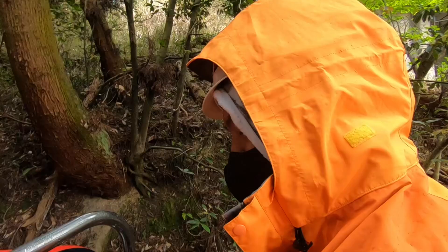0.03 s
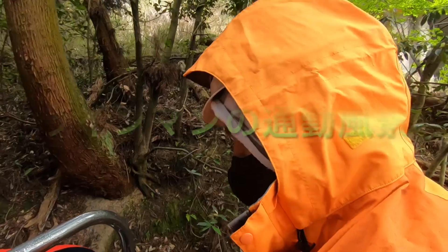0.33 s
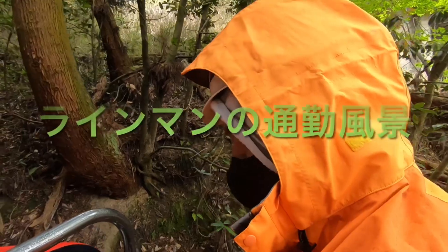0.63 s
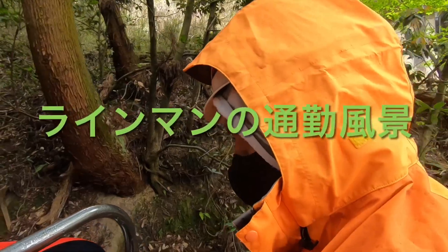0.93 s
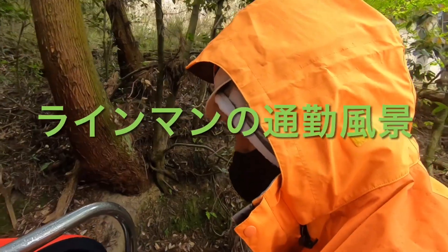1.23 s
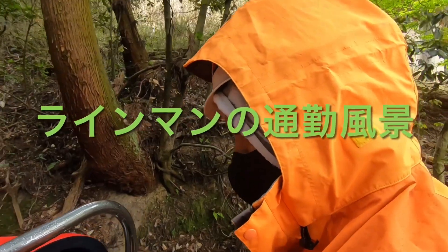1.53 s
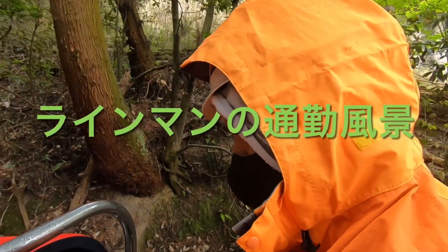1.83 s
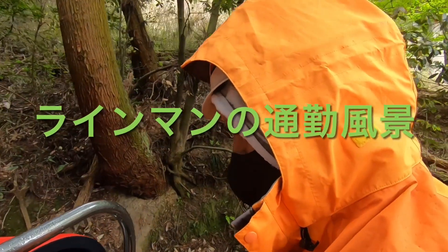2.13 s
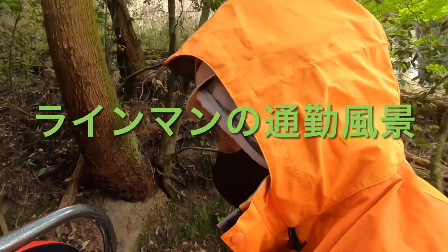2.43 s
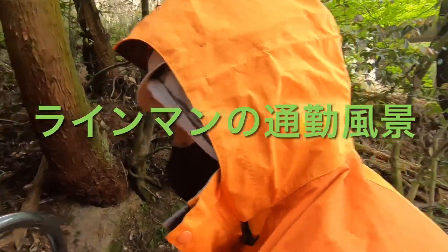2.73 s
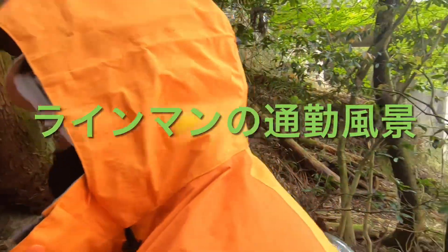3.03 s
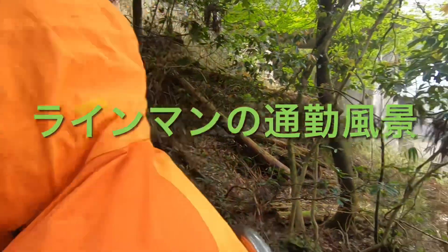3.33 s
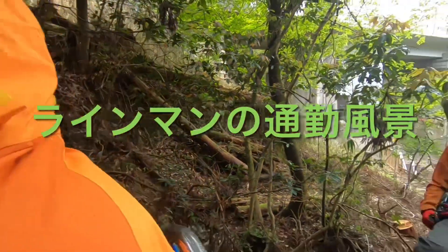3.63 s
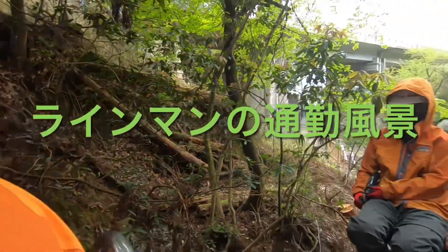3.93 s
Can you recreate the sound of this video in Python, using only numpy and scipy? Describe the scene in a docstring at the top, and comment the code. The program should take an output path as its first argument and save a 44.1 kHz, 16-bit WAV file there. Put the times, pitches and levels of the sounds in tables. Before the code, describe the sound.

A small petrol engine on a work monorail fades in within the first 0.3 seconds and drones close by at constant speed. Its deep hum carries rapid valve and gear clatter, ringing metal covers, an exhaust burble in short swells and rushing air. From about 3 seconds the microphone turns, the clatter softens and a mid-pitched gear whine comes forward, while the drone continues to the end at 4 seconds.

```python
"""Work monorail on a wooded slope

Taken from the seat, close to a small petrol engine that climbs at a governed, steady speed.
A deep two-note drone carries a clatter of valves and gears that repeats every engine cycle, with
ringing metal covers, an exhaust burble that surges as puffs ring the pipe, and rushing air.
The sound fades in; near the end the microphone turns, the clatter softens, a gear tone comes forward."""
import sys
import numpy as np
from scipy import signal
from scipy.fft import irfft
from scipy.io import wavfile
from scipy.ndimage import uniform_filter1d

SR = 44100
rng = np.random.default_rng(int(sys.argv[2]) if len(sys.argv) > 2 else 0)


def pcm_store(signal):
    """Save signal as 16-bit PCM."""
    levels = np.round(np.clip(np.atleast_2d(signal), -1, 1) * 32767)
    wavfile.write(sys.argv[1], SR, levels.astype(np.int16).T)


N = 176400
TIME = np.arange(N) / SR
CYCLE_HZ = 27.58   # engine cycles a second


def engine_cycles():
    """Running count of engine cycles; the governor leaves only a slight wander and flutter."""
    speed = 1 + 0.000399 * drift(0.84) + 0.0015 * drift(23.4)
    return np.cumsum(CYCLE_HZ * speed) / SR


def drone(cycles, level_db=-18, overtone_lag_s=0.0003):
    """Harmonics 3 and 6 line up into three pressure dips a cycle; the weak ones fall anywhere."""
    # low engine harmonics: (multiple of the cycle rate, relative level [dB])
    harmonics = [(1, -49.5), (2, -20.5), (3, 0.5), (4, -24), (5, -20), (6, -2), (7, -19.5), (8, -18),
                 (9, -19), (10, -20.5), (11, -19), (12, -25), (13, -33.5)]
    # the lowest three fill out: (time [s], gain [dB])
    bass_swell = [(.2, -5.5), (1.1, -2.5), (2, -1), (4, -0.55)]
    aligned = {3: 0, 6: 6 * CYCLE_HZ * overtone_lag_s}
    out = 0
    for multiple, db in harmonics:
        offset = aligned.get(multiple, rng.random())
        swell_db = in_time(bass_swell)[0] if multiple <= 3 else 0
        tone = np.sqrt(2) * np.cos(2 * np.pi * (multiple * cycles - offset))
        out = out - from_db(level_db + db + swell_db) * tone
    return out


def exhaust(beat, depth=0.82):
    """Puffs of noise, three a cycle, ring the exhaust pipe."""
    # pipe resonances: (frequency [Hz], width [Hz], level [dB])
    pipe = [(224, 47, -34.5), (290.7, 49, -32.5)]
    out = 0
    for hz, width_hz, db in pipe:
        puffs = (1 + depth * beat) * rng.standard_normal(N)
        out = out + from_db(db) * rms_one(resonance(puffs, hz, width_hz))
    return out


def exhaust_surges(beat, throb=0.13):
    """Runs of harder puffs make the pipe boom in short, rounded swells."""
    # swells of the boom: (peak time [s], length [s], level [dB])
    surges = [(.33, 0.22, -32.5), (.56, 0.075, -32), (0.828, 0.077, -27), (1.104, 0.073, -27.5),
              (1.347, 0.12, -27.5), (1.71, 0.19, -28.5), (1.807, 0.048, -24), (2.103, .09, -23.5),
              (2.35, .14, -30), (2.487, 0.078, -25), (2.715, 0.16, -28.5), (2.94, 0.2, -26.5),
              (3.168, 0.12, -25.5), (3.304, 0.138, -27.5), (3.466, 0.078, -26), (3.74, 0.17, -25.5)]
    boom = resonance(rng.standard_normal(N), hz=280.8, width_hz=48)
    boom = even_level(boom, samples=900)
    swell = 0
    for peak_s, length_s, db in surges:
        position = np.clip((TIME - peak_s) / length_s, -0.5, 0.5)
        swell = swell + from_db(db) * np.cos(np.pi * position)
    return swell * rms_one(boom * (1 + throb * beat))


def contacts(cycles, size=3200, roughness=0.23):
    """One cycle of dense tooth and valve contacts, repeated with uneven force; rms 1."""
    spectrum = np.exp(2j * np.pi * rng.random(size // 2 + 1))
    hz = np.arange(len(spectrum)) * CYCLE_HZ
    loop = 0
    for low in 180 * 2 ** np.arange(7):
        octave = irfft(spectrum * (hz >= low) * (hz < 2 * low))
        envelope = np.sqrt(uniform_filter1d(octave ** 2, size // 3, mode="wrap"))
        loop = loop + np.sqrt(low) * octave / envelope   # even in colour and in level
    repeated = np.interp(cycles % 1, np.linspace(0, 1, size, endpoint=False), loop)
    return rms_one(repeated * (1 + roughness * drift(43)))


def clatter_and_rush(cycles, beat, lag_s, throb=0.039):
    """Repeating contacts and throbbing air noise, coloured band by band by the engine casing."""
    # valve and gear clatter: (frequency [Hz], base density [dB/Hz])
    clatter = [(250, -83), (400, -72), (600, -63), (900, -69.5), (1150, -69.5), (1600, -62.5),
               (2250, -64.5), (2650, -69.5), (3400, -71), (4400, -83.5), (7500, -88), (10200, -97.5),
               (12000, -115)]
    # rush of the fan and exhaust: (frequency [Hz], base density [dB/Hz])
    rush = [(25, -55.5), (60, -59.5), (130, -53), (200, -56.5), (400, -64), (700, -62.5), (1100, -66.5),
            (2100, -66.5), (2700, -74.5), (3500, -77), (4600, -84.5), (6000, -80), (7500, -81.5),
            (9000, -92), (10200, -81.5), (11500, -105), (14000, -102)]
    # stereo image at the seat: (frequency [Hz], likeness of the channels [0-1], left over right [dB])
    image = [(25, 0.52, 1.5), (100, 0.74, 2), (256, 0.97, -2), (417, 0.78, -4), (684, 0.43, 1.5),
             (990, 0.45, 1.5), (1500, 0.18, 4), (2270, 0.75, 5.5), (3300, 0.35, 1.5), (3900, 0.36, 2.5),
             (5200, 0.5, 0), (7000, 0.08, -5.5), (9600, 0, -0.5)]
    # shifting tone colour: (time [s], then gain [dB] at each of colour_hz)
    colour = [(.15, -1.5, -0.5, -1, -7), (.7, -1, 0.9, 0, -2.5), (1.3, 0.4, .5, 1, -0.5),
              (2, 0.4, 0.8, 0, -1.5), (2.55, 0.4, 0.7, -1.2, -0.4), (3, -0.6, -0.5, -0.7, -2),
              (3.5, -0.5, -6, 1, -2), (4, -1.7, -5.5, -3, -0.5)]
    colour_hz = (800, 1900, 3000, 6500)
    colour_gains = from_db(in_time(colour))
    # two mid-side pairs of each source; neighbouring bands take them in turn
    knocks = np.array([[contacts(cycles) for _ in range(2)] for _ in range(2)])
    air = rng.standard_normal((2, 2, N)) * (1 + throb * beat)
    edges = np.concatenate([np.geomspace(22, 350, 7)[:-1], np.geomspace(350, 14500, 24)])
    out = 0
    for k, (low, high) in enumerate(zip(edges, edges[1:])):
        hz = np.sqrt(low * high)
        source = from_db(at_hz(rush, hz)[0]) * air[k % 2]
        source += from_db(at_hz(clatter, hz)[0]) * knocks[k % 2]
        band = signal.butter(3, [low, high], "band", fs=SR, output="sos")
        mid, side = signal.sosfilt(band, source)
        alike, pan_db = at_hz(image, hz)
        mid *= np.sqrt((1 + alike) / 2)
        side *= np.sqrt((1 - alike) / 2)
        shares = np.array([np.interp(np.log(hz), np.log(colour_hz), row) for row in np.eye(4)])
        out = out + (shares @ colour_gains) * place((mid + side, mid - side), hz, pan_db, lag_s)
    return out * np.sqrt(SR / 2)


def metal_covers(cycles, lag_s):
    """The contacts keep the covers ringing, a little harder or softer from blow to blow."""
    # cover resonances: (frequency [Hz], width [Hz], roughness [dB], left over right [dB])
    modes = [(1687, 280, 0, 10.5), (2150, 280, 0.5, 7.5), (2290, 150, -1.7, -2.5), (2694, 190, 3, -5),
             (3266, 150, 3, -3), (3350, 650, 4.5, 1)]
    # how strongly they ring: (time [s], then level [dB] of each resonance)
    mode_levels = [(.2, -50, -38, -47, -63, -52, -51), (.8, -50, -37, -36, -52, -46, -45.5),
                   (1.3, -44, -41, -35, -50, -56, -44.5), (1.9, -51, -33, -38, -56, -56, -46),
                   (2.25, -36, -41, -35, -50, -56, -51), (2.75, -41, -42.5, -42, -38, -42, -54),
                   (3.3, -42, -48, -48, -46, -56, -59), (4, -55, -51, -49, -47, -47, -51)]
    out = 0
    for (hz, width_hz, rough_db, pan_db), db in zip(modes, in_time(mode_levels)):
        ring = even_level(resonance(contacts(cycles), hz, width_hz), samples=620)
        ring = from_db(db) * rms_one(ring * from_db(rough_db * drift(70)))
        out = out + place((ring, ring), hz, pan_db, lag_s)
    return out


def gear_tone(cycles, multiple, chatter, waver_db=1, shake_db=1.1):
    """An uneven tone on the nearest whole multiple of the cycle rate; rms 1."""
    tone = np.sin(2 * np.pi * (round(multiple) * cycles + rng.random()))
    uneven_db = waver_db * drift(2.5) + shake_db * drift(16.4)
    tooth_force = 1 + chatter * multiple * CYCLE_HZ / 2000   # higher tones chatter more
    return rms_one(tone * tooth_force * from_db(uneven_db))


def gears(cycles, lag_s, turn_s=(2.8, 2.82)):
    """Three gear whines swell and fade; lesser tones change level as the microphone turns."""
    # the strongest gear tones: (time [s], then level [dB] of each whine)
    whines = [(.2, -40, -53, -57), (.6, -38, -43, -56), (1.2, -38, -41.5, -44), (1.7, -38, -38, -45),
              (2.4, -42.5, -41.5, -38), (3.08, -46.5, -51, -32), (3.17, -35.5, -51, -37),
              (3.9, -33, -46, -56)]
    whine_multiples, whine_pans_db = (16, 32, 63), (-3.5, 1, 6)
    # lesser gear and casing tones:
    # (multiple of the cycle rate, level [dB], level after the turn [dB], left over right [dB])
    lesser_tones = [(15, -49.5, -41.5, -8), (18, -44, -51, -3), (21, -47, -44.5, 0), (24, -50.5, -46.5, 1),
                    (26, -50, -63, -9), (27, -47, -47, -2), (28, -44.5, -51, -0.5), (30, -45.5, -50.5, -7),
                    (34, -43.5, -46, 1), (35, -44.5, -44, 4), (37, -50.5, -49, -5), (48, -46, -51, -4),
                    (52, -45.5, -49, 0), (55, -46, -56, 5.5), (58, -45, -50, 4), (61, -45.5, -49.5, 1.5),
                    (65.73, -48.5, -49, 15), (76.7, -41, -45, 11), (78, -46, -53, 7), (97.1, -68, -45, 9),
                    (100.7, -53.5, -55, 5.5)]
    chatter = 0.083 * drift(55)   # tooth-to-tooth unevenness
    out = 0
    for multiple, db, pan_db in zip(whine_multiples, in_time(whines), whine_pans_db):
        tone = from_db(db) * gear_tone(cycles, multiple, chatter)
        out = out + place((tone, tone), multiple * CYCLE_HZ, pan_db, lag_s)
    for multiple, db, turned_db, pan_db in lesser_tones:
        gain = np.interp(TIME, turn_s, from_db([db, turned_db]))
        tone = gain * gear_tone(cycles, multiple, chatter)
        out = out + place((tone, tone), multiple * CYCLE_HZ, pan_db, lag_s)
    return out


def sizzle():
    """Air hisses faintly through a narrow resonance, to the right of the microphone."""
    # strength of the hiss: (time [s], level [dB])
    levels = [(.15, -56), (.6, -51), (1.1, -48.5), (2.3, -50.5), (2.9, -55.5), (4, -52)]
    hiss = resonance(rng.standard_normal((2, N)), hz=7820, width_hz=960)
    return rms_one(hiss) * from_db(in_time(levels)[0]) * pan(-14)


def resonance(x, hz, width_hz):
    """One resonance applied twice, so its skirts are steep."""
    b, a = signal.iirpeak(hz, hz / width_hz, fs=SR)
    return signal.lfilter(b, a, signal.lfilter(b, a, x))


def drift(rate, step=40):
    """Smooth random motion of spread 1 that changes about rate times a second."""
    pole = np.exp(-2 * np.pi * rate * step / SR)
    noise = rng.standard_normal(N // step + 2002)
    slow = signal.lfilter([1], [1, -2 * pole, pole * pole], noise)[2000:]   # once settled
    return np.interp(np.arange(N) / step, np.arange(len(slow)), rms_one(slow))


def place(pair, hz, pan_db, lag_s):
    """Set the balance of one band; treble reaches the right channel late."""
    left, right = pair
    if hz > 1400:
        right = np.interp(TIME - lag_s, TIME, right)
    return np.array([left, right]) * pan(pan_db)


def pan(db):
    """Left and right gains of constant power; positive is left."""
    gains = from_db([[db / 2], [-db / 2]])
    return rms_one(gains)


def from_db(db):
    """Decibels to gain."""
    return 10 ** (np.asarray(db) / 20)


def rms_one(x):
    """Scale to unit rms."""
    return x / np.sqrt(np.mean(x ** 2) + 1e-20)


def even_level(x, samples):
    """Hold the running rms near 1."""
    return x / np.sqrt(uniform_filter1d(x ** 2, samples) + 1e-12)


def in_time(rows):
    """The columns of a curve at every sample."""
    times, *columns = np.transpose(rows)
    return [np.interp(TIME, times, column) for column in columns]


def at_hz(rows, hz):
    """The columns of a spectrum at one frequency."""
    freqs, *columns = np.transpose(rows)
    return [np.interp(np.log(hz), np.log(freqs), column) for column in columns]


def scene():
    """The engine from the seat: drone, exhaust puffs and metal all follow one shaft."""
    # how squarely the engine lies to the left as the microphone turns: (time [s], share [0-1])
    bearing = [(0, 0.88), (2.6, 0.94), (3.1, 0.91), (3.5, 0.27), (4, 0.11)]
    treble_lag_s, drone_lag_s = 0.00026 * in_time(bearing)[0], 0.00012   # right channel behind left
    cycles = engine_cycles()
    beat = np.cos(2 * np.pi * (3 * cycles - 0.2))   # puffs trail the drone's dips
    metal = gears(cycles, treble_lag_s) + metal_covers(cycles, treble_lag_s)
    clatter = clatter_and_rush(cycles, beat, treble_lag_s)
    stereo_cycles = np.array([cycles, cycles - drone_lag_s * CYCLE_HZ])
    return drone(stereo_cycles) + exhaust(beat) + exhaust_surges(beat) + clatter + metal + sizzle()


def record(dry, cutoff_hz=14700):
    """The sound fades in and the top is cut."""
    # fade-in: (time [s], gain [dB])
    fade = [(.09, -88), (.108, -38), (.12, -20), (.14, -9), (.17, -2), (.27, -0.5), (.6, 0.25), (1.1, 0.5),
            (4, 0)]
    lowpass = signal.cheby2(12, 70, cutoff_hz, fs=SR, output="sos")
    return signal.sosfilt(lowpass, dry * from_db(in_time(fade)[0]))


dry = scene()
out = record(dry)
pcm_store(out)
```